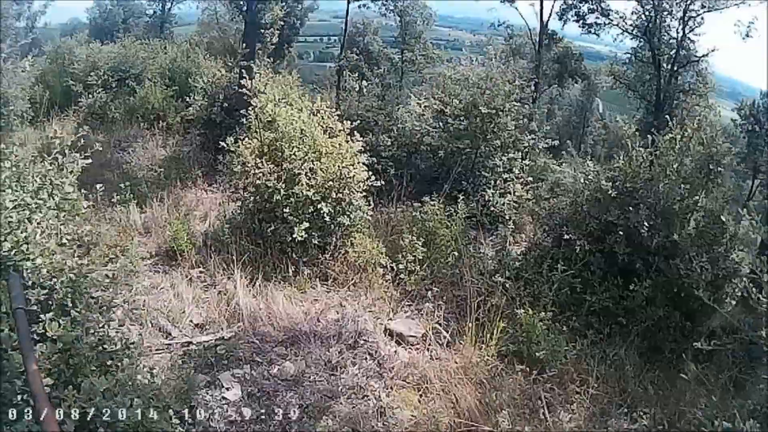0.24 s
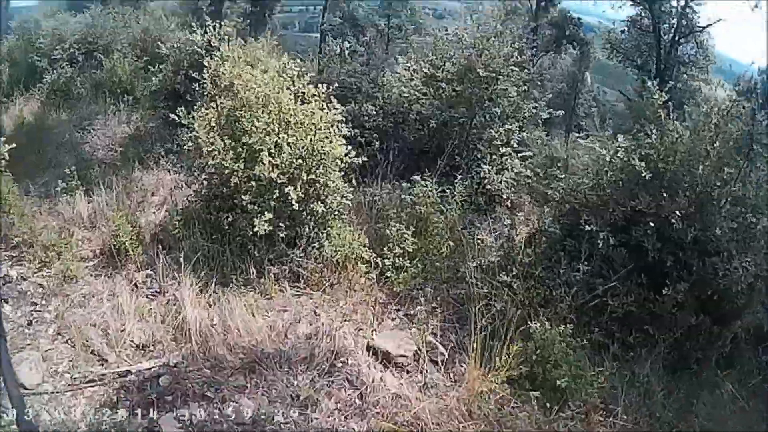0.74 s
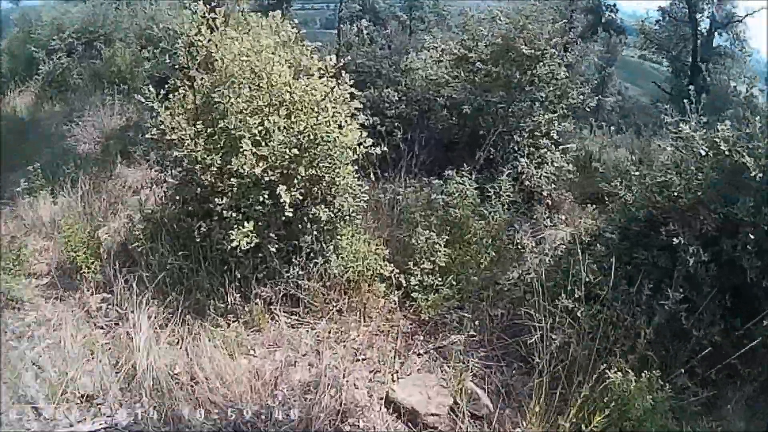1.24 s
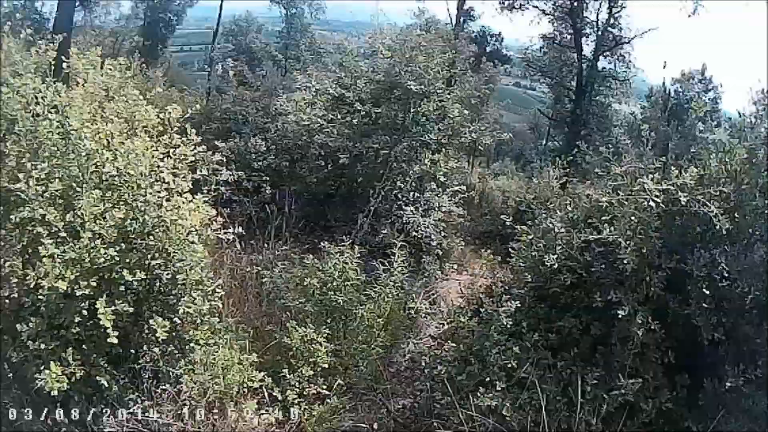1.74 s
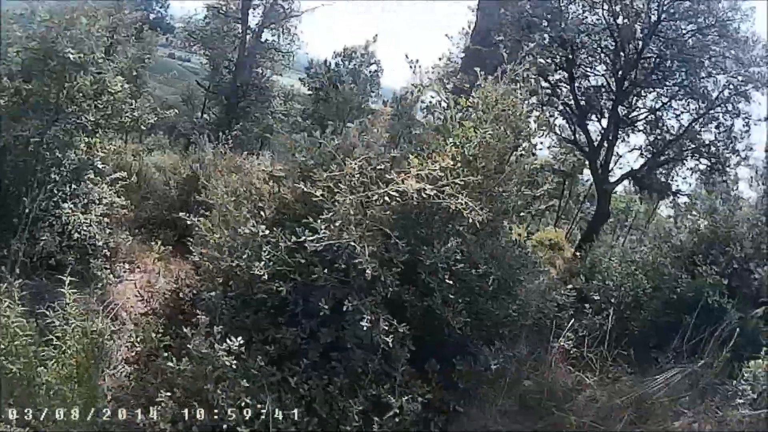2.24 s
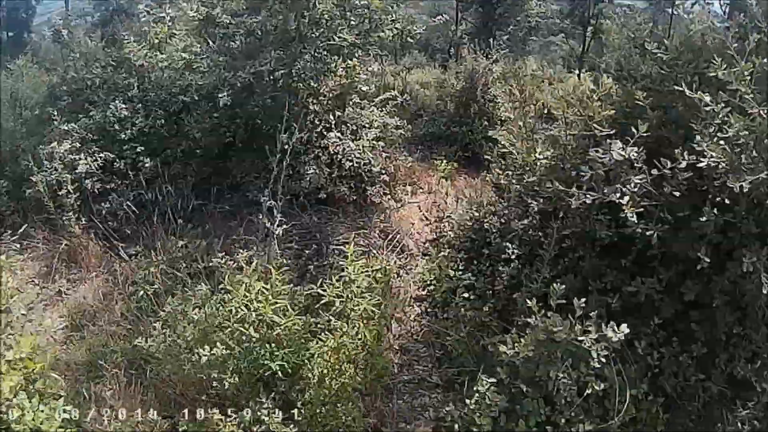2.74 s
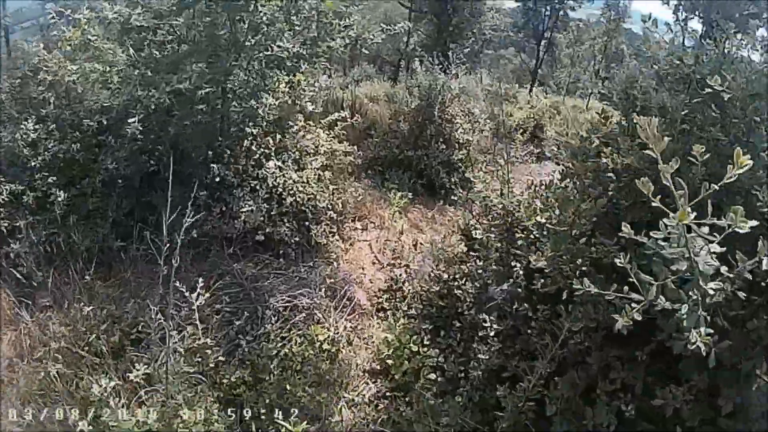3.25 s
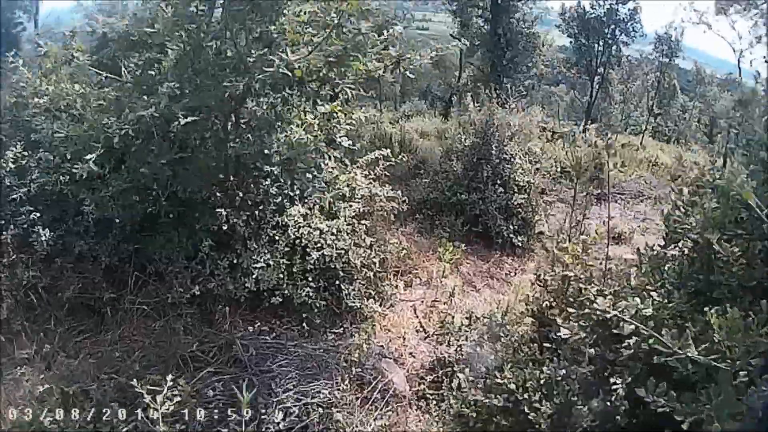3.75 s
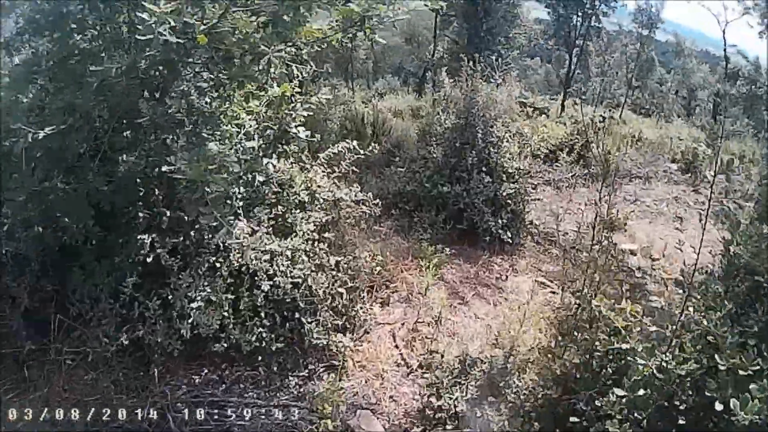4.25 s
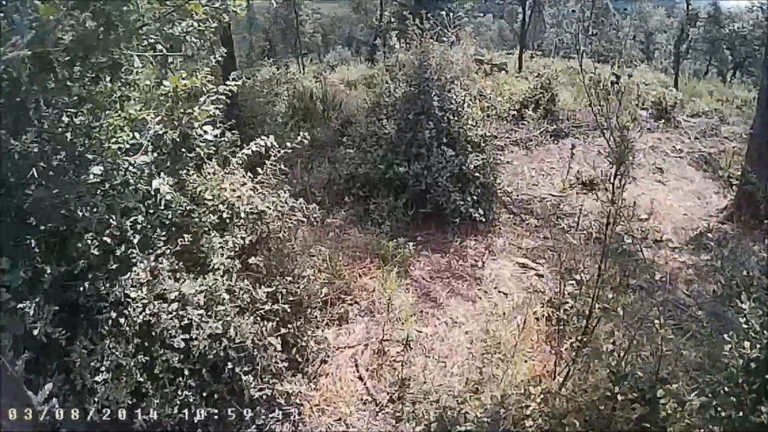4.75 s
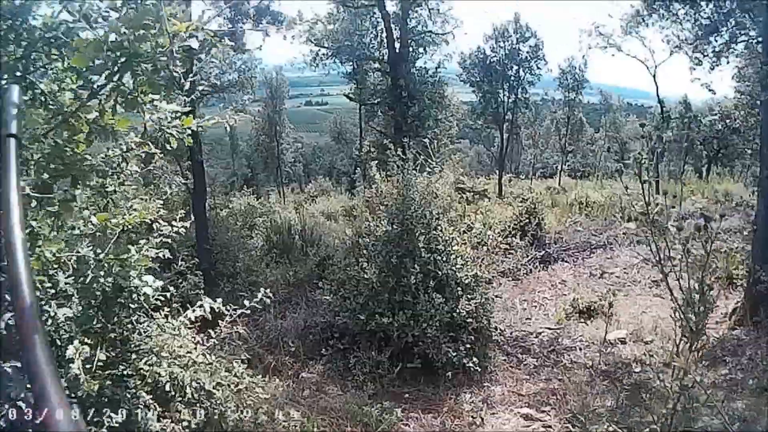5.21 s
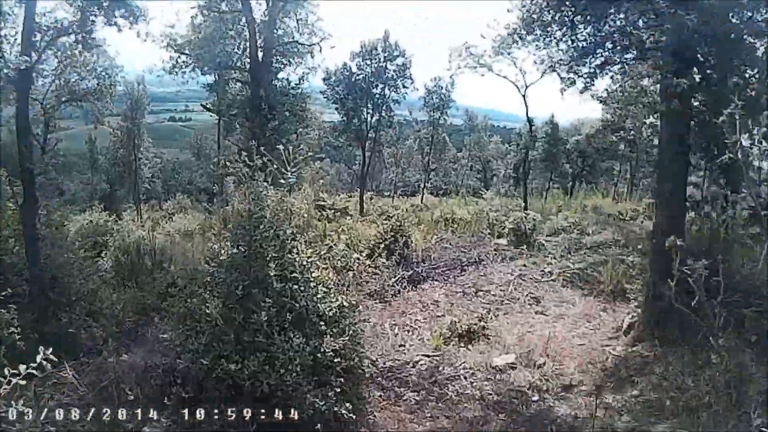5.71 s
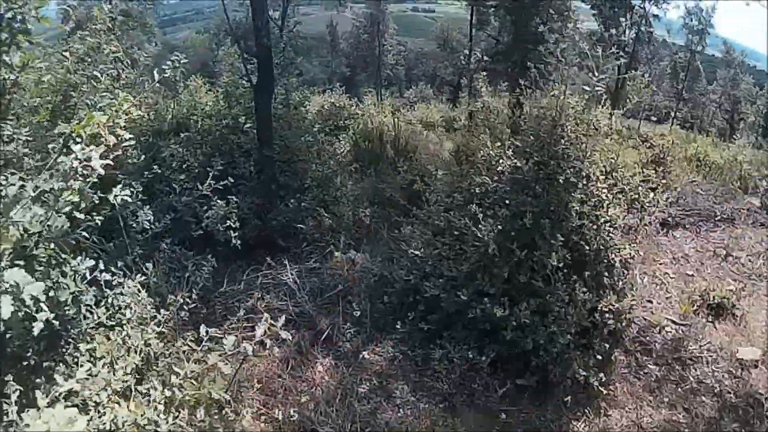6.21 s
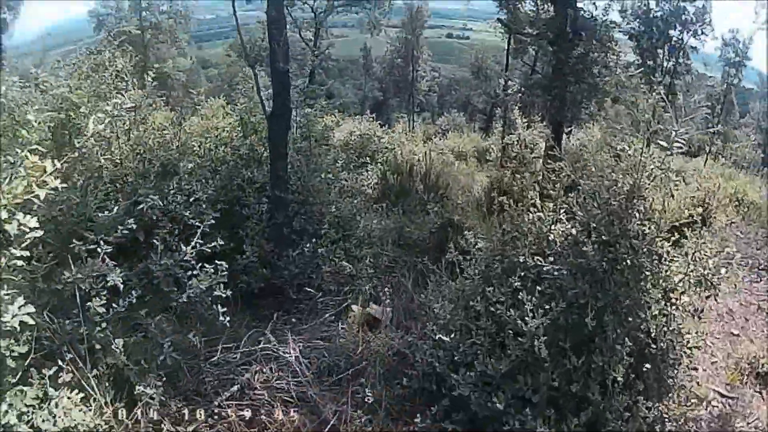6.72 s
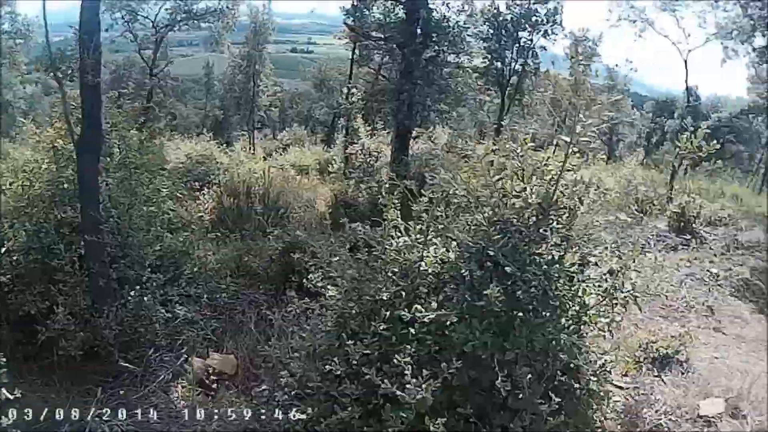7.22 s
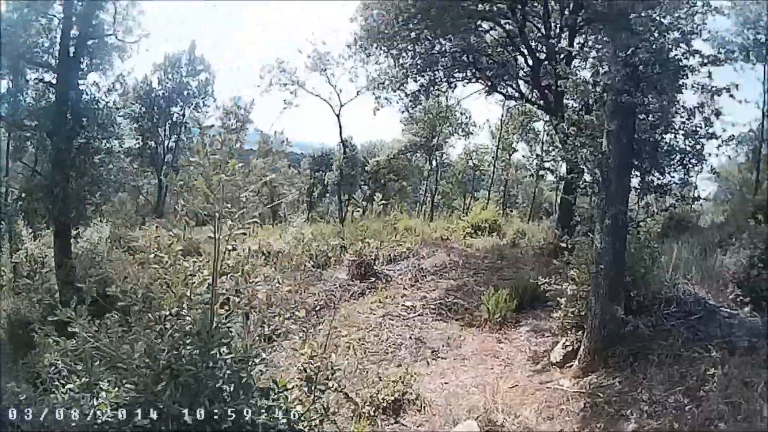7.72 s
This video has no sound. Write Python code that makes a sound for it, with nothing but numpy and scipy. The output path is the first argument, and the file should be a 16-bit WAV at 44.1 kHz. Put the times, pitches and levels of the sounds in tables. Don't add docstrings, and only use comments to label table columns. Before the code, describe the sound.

Close, boxy handling noise from a camera in a hard housing carried through dry scrub outdoors. Deep mount thumps and hollow plastic clacks cluster in the first second, then recur irregularly, with the sharpest knock near 3.8 seconds. Muffled crunching litter and cloth-like rubbing swell with each stride. A few twigs snap early, over faint hiss and a high whine.

```python
import sys
import numpy as np
from scipy import signal
from scipy.fft import rfft, irfft, next_fast_len
from scipy.io import wavfile
from scipy.ndimage import uniform_filter1d, map_coordinates

SR = 44100
rng = np.random.default_rng(int(sys.argv[2]) if len(sys.argv) > 2 else 0)


def dump(signal):
    limited = np.clip(np.atleast_2d(signal).T, -1, 1)
    pcm = np.round(limited * 32767).astype(np.int16)
    wavfile.write(sys.argv[1], SR, pcm)


def rack_gain(trim_db):
    fader = np.asarray(trim_db, float)
    return 10 ** (fader / 20)


N = 351477
STEP_S = 0.002

# (time [s], main mode peak [dB], then relative to it:
# lower modes [dB], upper modes [dB], bright modes [dB])
KNOCKS = [(0.032, -27, -12, -14, -13), (0.507, -35.5, -2, -6, -16), (0.512, -23, -9, -15, -17),
          (0.53, -32.5, 2, 3.5, -1.5), (0.537, -29, -1, -4, -9), (0.561, -49, -6, 0, 2),
          (0.575, -32, -8, -7, -15), (0.867, -48, -13, 5, 2), (0.906, -22.5, -7.5, -11, -15),
          (0.918, -31, -1, -13, -7), (0.972, -35, -6, -11, -17), (0.99, -41.5, 5, 7.5, 0),
          (1.131, -35, -6, -4, -7), (1.27, -26.5, -8, -12, -15), (1.515, -30, -7, -11, -16),
          (1.949, -31, -9, -2, -22), (2.425, -31.5, -22, -7, -8), (2.671, -25.5, -25, -7, -14.5),
          (2.684, -31.5, -6, -16, -9), (3.664, -38, -9, -4, -5), (3.725, -49, 3, 10, 9),
          (3.743, -34, -4, -4, -21), (3.765, -32, 3, -12, -11), (3.776, -13, -9, -10.5, -8.5),
          (3.781, -28, -5, -10, -3.5), (3.789, -38, 6, -7, -5), (3.83, -30.5, -7, -8, -13),
          (3.846, -41, -5, -12, -1), (4.013, -43, -2, -17, 4.5), (4.044, -38, -13, -27, -8),
          (4.152, -21.5, -7, -9, -13), (5.422, -27.5, -4, -7.5, -10), (5.821, -21.5, -12, -8.5, -5.5),
          (7.004, -40.5, -8, -19, -12), (7.138, -40.5, -10, -6, -7.5), (7.228, -33.5, -16, -2.5, 0.5),
          (7.326, -37.5, -2, -10, -14), (7.346, -41, -4, -9, 1.5), (7.403, -44, -11, -16, -3),
          (7.51, -40, -5, -6.5, -9)]
# (frequency [Hz], bandwidth [Hz], level [dB])
SHELL = [(1190.4, 80, 2.5), (1358, 87, -2.5)]


def unit(x):
    return x / np.sqrt(np.mean(x ** 2) + 1e-20)


def wobble(rate):
    knots = rng.standard_normal(int(N * rate / SR) + 4)
    return map_coordinates(knots, [np.arange(N) * rate / SR])


def filtered(x, response):
    m = next_fast_len(N + SR // 2)
    return irfft(rfft(x, m) * response(np.fft.rfftfreq(m, 1 / SR)), m)[:N]


def coloured(x, points):
    f, db = np.transpose(points)
    return unit(filtered(x, lambda hz: rack_gain(np.interp(np.log(hz + 1), np.log(f), db))))


def ring(x, modes):
    def response(f):
        total = 0
        for k, (centre, width, db) in enumerate(modes):
            damping = 1j * f * width
            total = total + (-1) ** k * rack_gain(db) * damping / (centre ** 2 - f ** 2 + damping)
        return total
    return filtered(x, response)


def low_pass(x, hz):
    return filtered(x, lambda f: 1 / (1 + 1.3j * f / hz - (f / hz) ** 2) ** 2)


def gritty(per_second, spread_db, share):
    hit, size, sign = rng.random((3, N))
    heights = rack_gain(-spread_db * np.log(size + 0.026))
    grains = (hit < per_second / SR) * heights * np.sign(sign - 0.5)
    return np.sqrt(share) * unit(grains) + np.sqrt(1 - share) * rng.standard_normal(N)


def contacts(rows, ms, rough, hz, width=0.14):
    force = np.zeros((len(hz), N + SR))
    u = np.arange(SR // 20) / SR / (ms / 1000)
    near = np.abs(np.fft.rfftfreq(len(u), 1 / SR) / np.array(hz)[:, None] - 1) < width
    for s, db, *colours_db in rows:
        push = np.sqrt(u) * np.exp(-u) * rng.standard_normal(len(u))
        push[8] += np.linalg.norm(push) / rough
        strength = np.sqrt(near @ np.abs(rfft(push)) ** 2 / near.sum(1))
        gain = rack_gain(db + np.array([0, *colours_db])) / strength
        force[:, round(s * SR):][:, :len(u)] += push * gain[:, None]
    return force[:, :N]


def summed_db(rows_db, rest_db):
    return 10 * np.log10(sum(rack_gain(2 * db) for db in rows_db) + rack_gain(2 * rest_db))


def bell_db(offset):
    return -10 / np.log(10) * np.minimum(offset ** 2, 50)


def per_sample(slow):
    return np.interp(np.arange(N) / SR, np.arange(len(slow)) * STEP_S, slow)


def strides(rub_share=0):
    # (time [s], strength [dB], rise [s], fall [s], rubbing above the usual [dB])
    stride_rows = [(0.032, -58.5, 0.063, 0.096, -7.5), (0.5, -67, 0.59, 0.52, 1),
                   (0.87, -65, 0.36, 0.54, 1.5), (1.288, -60.5, 0.18, 0.09, -4),
                   (1.753, -63, 0.13, 0.051, -1), (2.141, -61.5, 0.24, 0.11, 0.5),
                   (2.8, -79.5, 0.15, 0.026, 13), (2.939, -62.5, 0.39, 0.087, 0.5),
                   (3.302, -60, 0.11, 0.14, -1), (3.768, -67.5, 0.2, 0.025, 1.5),
                   (4.136, -61, 0.21, 0.093, -3), (4.705, -63, 0.1, 0.098, -2),
                   (5.141, -63, 0.076, 0.23, -0.5), (5.68, -63, 0.13, 0.2, -6.5),
                   (5.804, -61.5, 0.082, 0.08, 2), (6.401, -62.5, 0.083, 0.077, -1.5),
                   (6.955, -63.5, 0.12, 0.17, -3.5), (7.439, -71, 0.21, 0.021, 5.5),
                   (7.537, -62.5, 0.25, 0.084, -0.5), (7.819, -71.5, 0.11, 0.11, 3)]
    still_db, usual_db = -68, -63
    t = np.arange(0, N / SR, STEP_S)
    rows_db = []
    for s, db, rise, fall, rub_db in stride_rows:
        bell = bell_db((t - s) / np.where(t < s, rise, fall))
        rows_db.append(db + rub_share * rub_db + bell)
    return summed_db(rows_db, still_db) - usual_db


def jolts():
    # (time [s], peak [dB], hold [s], decay [dB/s], shudder relative to it [dB])
    jolt_rows = [(0.003, -22, 0.064, 333, -27), (0.27, -32.5, 0.045, 99, -11.5),
                 (0.528, -9.5, 0.001, 261, -16.5), (0.597, -22, 0.024, 539, -6),
                 (0.704, -30.5, 0.12, 602.5, -10), (0.923, -8.5, 0.0011, 523, -25),
                 (0.964, -18.5, 0.011, 153, -11.5), (1.146, -17, 0.048, 121, -12.5),
                 (1.621, -16.5, 0.02, 213, -14.5), (1.805, -38.5, 0.24, 598, -11),
                 (2.055, -21, 0.053, 183, -15.5), (2.662, -26.5, 0.074, 64.5, -5.5),
                 (3.202, -21.5, 0.0016, 88.5, -20.5), (3.758, -13.5, 0.073, 163, -8),
                 (4.01, -21, 0.084, 196, -12.5), (4.581, -27, 0.11, 344, -32),
                 (5.105, -23.5, 0.068, 290, -17), (5.299, -38, 0.004, 49, -18),
                 (5.623, -21, 0.068, 115, -19), (6.275, -27, 0.025, 129, -16), (6.861, -38, 0.13, 26, -11),
                 (7.334, -22, 0.055, 174, -9.5), (7.524, -26, 0.0032, 430, -16.5),
                 (7.731, -39, 0.071, 601, -12)]
    # (time [s], peak [dB])
    stirs = [(.2, -39.5), (2.47, -42), (2.93, -37.5), (3.52, -38), (4.341, -43.5), (4.42, -43),
             (4.616, -27.5), (5.03, -34.5), (5.54, -41), (5.98, -40), (6.1, -45.5), (6.381, -35.5),
             (6.77, -45), (6.81, -40), (2.32, -42.5), (2.56, -40.5), (7.37, -19), (7.87, -46), (7.95, -40)]
    rise_db_s, shudder_faster_db_s = 639, 47
    t = np.arange(0, N / SR, STEP_S)
    swing, shudder = [], []
    for s, db, hold, dying, shudder_db in jolt_rows + [(s, db, 0.023, 305, -16.5) for s, db in stirs]:
        rise_db = db + rise_db_s * np.minimum(t - s, 0)
        swing.append(rise_db - dying * np.maximum(t - s - hold, 0))
        shudder.append(swing[-1] + shudder_db - shudder_faster_db_s * np.maximum(t - s, 0))
    rest_db = -49 + strides()
    return summed_db(swing, rest_db), summed_db(shudder, rest_db - 7)


def mount():
    # (frequency [Hz], level [dB per Hz])
    sway_spectrum = [(15, -27), (26, 2.5), (37, -2), (50, -0.5), (65, -28), (120, -55.5)]
    shudder_spectrum = [(35, -33), (52, 6.5), (75, 2), (100, -3.5), (130, -15), (200, -79)]
    db, shudder_db = map(per_sample, jolts())
    loading = uniform_filter1d(np.clip(np.gradient(db) * SR / 300, 0, 1.5), size=1500)
    pitch_hz = 36.5 + 7 * loading + 1.53 * wobble(5)
    phase = 2 * np.pi * np.cumsum(pitch_hz) / SR
    swing = np.sqrt(2) * rack_gain(1.5 * wobble(25)) * np.cos(phase - 1)
    loose = np.clip((-28 - db) / 14, 0, 0.7)
    sway = coloured(rng.standard_normal(N), sway_spectrum)
    shudder = rack_gain(shudder_db + 3) * coloured(rng.standard_normal(N), shudder_spectrum)
    level = rack_gain(db + 5 * loose * wobble(8.7))
    return level * (np.sqrt(1 - loose) * swing + np.sqrt(loose) * sway) + shudder


def nudges():
    # (time [s], peak [dB], pitch [Hz])
    nudge_rows = [(0.696, -34, 57.6), (0.722, -24, 72.5), (1.948, -29, 86), (2.428, -36, 81.2),
                  (2.832, -31.5, 57.5), (5.414, -30.5, 56.8), (7.71, -29.5, 67.3), (.001, -27, 88),
                  (1.508, -39, 86.5), (3.75, -17, 58), (3.78, -15.5, 75.4), (4.149, -33, 84),
                  (7.36, -23, 67.4), (2.664, -35, 75.5)]
    out = np.zeros(N + SR)
    t = np.arange(SR // 5) / SR
    onset = 1 - np.exp(-t / 0.0029)
    for s, db, hz in nudge_rows:
        decay = rack_gain(db + 7 - 60 * t / 0.1)
        out[round(s * SR):][:len(t)] += decay * onset * np.sin(2 * np.pi * hz * t)
    return out[:N]


def chatter(count=2):
    level_db, spread_db, fades_db_s = -31.5, 7.5, 153
    late = rng.exponential(0.025, (len(KNOCKS), count)) + 0.004
    size = rng.standard_normal((len(KNOCKS), count))
    rows = []
    for (s, db, *colours_db), lags, sizes in zip(KNOCKS, late, size):
        for lag, g in zip(lags, sizes):
            rows.append((s + lag, db + level_db + spread_db * g - fades_db_s * lag, *colours_db))
    return rows


def shell_knocks():
    # (time [s], peak [dB])
    ticks = [(.106, -47), (0.521, -48), (0.542, -49), (.595, -46), (0.602, -50), (0.62, -44), (.873, -54),
             (.904, -30), (0.929, -43), (.955, -49), (0.995, -39), (1.168, -38), (1.495, -44), (1.62, -44),
             (1.954, -37.5), (1.987, -45), (2.636, -47), (2.65, -50), (2.701, -39), (2.715, -47),
             (2.739, -48), (2.755, -47), (2.775, -46), (2.795, -45), (2.81, -53), (2.842, -48),
             (2.859, -44), (2.881, -56), (2.92, -53), (3.186, -47), (3.645, -48), (3.722, -48), (3.77, -40),
             (3.796, -47), (3.81, -48), (3.835, -47), (3.947, -52), (3.997, -46), (4.007, -50),
             (4.036, -41), (4.093, -47), (4.102, -49), (4.16, -39), (5.16, -50), (7.209, -51),
             (7.219, -41.5), (7.363, -50), (7.37, -50), (7.38, -48), (7.396, -45), (7.542, -53)]
    # (lower, upper, bright modes relative to the main [dB])
    tick_colour_db = (-7, -5, -10.5)
    # (frequency [Hz], bandwidth [Hz], level [dB])
    lower_modes = [(660, 430, -8), (846, 130, -1), (986, 29, -4)]
    upper_modes = [(1543, 78, -1), (1802, 64, -11.5)]
    bright_modes = [(1960, 58, -13), (2162, 110, -0.5), (2804, 153, -4), (3170, 210, -7.5),
                    (3550, 130, -8.5), (3850, 140, -9), (4380, 170, -13), (5040, 550, -29)]
    rows = KNOCKS + [(s, db, *tick_colour_db) for s, db in ticks] + chatter()
    force, lower, upper, bright = contacts(rows, ms=1.39, rough=1.02, hz=[1260, 860, 1580, 2280])
    main = ring(rack_gain(39) * ring(force, SHELL), [(1320, 890, 0)])
    body = main + rack_gain(40) * ring(lower, lower_modes) + rack_gain(42.5) * ring(upper, upper_modes)
    return low_pass(body, hz=2730) + low_pass(rack_gain(31.5) * ring(bright, bright_modes), hz=5050)


def case_bumps():
    # (time [s], middle mode peak [dB], then relative to it: low [dB], upper [dB])
    bumps = [(0.004, -31.5, -0.5, 1), (0.106, -39, -10, 4), (0.451, -47.5, -12, 9), (0.511, -30, -3, 4.5),
             (0.525, -23.5, 0, -0.5), (0.592, -41, -3, -19), (0.721, -36.5, 0, 0), (0.734, -42, -12, -20),
             (0.783, -34.5, -10, -0.5), (0.906, -19.5, -6, -4), (0.917, -30, -3, 3), (0.972, -28, -3, -3.5),
             (1.164, -25.5, -15, -7.5), (1.271, -32, -15, 1), (1.51, -34, 0.5, -1), (1.61, -36.5, 3, -1),
             (1.789, -37.5, -6, 3.5), (1.947, -37, -2, 10), (2.085, -46, 4, -4), (2.421, -48, 3.5, 16.5),
             (2.636, -37, -7, -2), (2.667, -28.5, -1.5, 2), (2.681, -24, -4.5, -1), (2.851, -38, -10, -17),
             (3.187, -41, -8, 3), (3.245, -49, 10, -14), (3.62, -41, -5, 2.5), (3.66, -40, -4, -10),
             (3.684, -42, 2, -14), (3.74, -32, 1, 2), (3.773, -17.5, 1, 0), (3.783, -31.5, -6, 10.5),
             (3.825, -26, -3, -0.5), (3.944, -43, -7, 6), (3.993, -30.5, -1, -12), (4.01, -26.5, -7, -2.5),
             (4.035, -38, 8.5, 2), (4.148, -30, 2, 8), (5.106, -42, 2, -19), (5.159, -35.5, -5, 1.5),
             (5.208, -53, 1, 14), (5.419, -37, -1, 6), (5.816, -36, -0.5, 2.5), (7.13, -39.5, -12, 3),
             (7.224, -30.5, -3, 4), (7.324, -28, -0.5, -5), (7.342, -27, -10, -16), (7.367, -32, 3, 2),
             (7.401, -30, -17, -10), (7.504, -33, -12, -4)]
    # (frequency [Hz], bandwidth [Hz], level [dB])
    low_modes = [(142, 43, 0.0062)]
    middle_modes = [(182, 47, -6.5), (232.6, 32.4, 1.5), (307, 46, -10)]
    upper_modes = [(385.5, 52, 5), (519, 170, -10.5)]
    force = contacts(bumps, ms=4.5, rough=1.09, hz=[215, 135, 430], width=0.22)
    middle, low, upper = np.roll(force, SR // 500, axis=1)
    thud = rack_gain(49.5) * (ring(middle, middle_modes) + ring(low, low_modes))
    return low_pass(thud, hz=394) + low_pass(rack_gain(41) * ring(upper, upper_modes), hz=676)


def twigs():
    # (time [s], peak [dB])
    snaps = [
        (0.0318, -31.5),
        (0.0474, -46),
        (0.5077, -42),
        (1.1308, -35),
    ]
    # (time [s], level [dB])
    sweep = [
        (0, -47),
        (.04, -82),
        (.07, -65),
        (.11, -57),
        (.14, -70),
        (.2, -92),
    ]
    # (frequency [Hz], level [dB per Hz])
    leaf_spectrum = [(1200, -27.5), (2200, -1), (3700, 10), (6500, -16), (11000, -17), (14000, -26)]
    force = contacts(snaps, ms=2.2, rough=4.5, hz=[6060])[0]
    cracks = rack_gain(16) * ring(force, [(3870, 1200, -0.5), (6450, 1100, 2.5), (10800, 1200, -4)])
    sweep_db = np.interp(np.arange(N) / SR, *np.transpose(sweep))
    leaves = coloured(gritty(410, 2.7, 0.4), leaf_spectrum)
    return cracks + rack_gain(sweep_db + 2 * wobble(82)) * leaves


def drags():
    # (time [s], level [dB], half length [s])
    drag_rows = [(0.085, -48.5, 0.06), (.33, -57, 0.082), (0.645, -51, 0.046), (0.79, -51.5, 0.062),
                 (0.956, -53, 0.036), (1.07, -57, 0.056), (1.215, -61, 0.068), (1.328, -56, 0.047),
                 (1.66, -54, 0.043), (2.005, -57, .05), (2.46, -60, 0.021), (2.57, -61, 0.015),
                 (2.624, -56, .03), (2.76, -50, 0.067), (2.92, -57.5, .06), (3.3, -59, .1),
                 (3.953, -56, 0.036), (4.1, -53, .05), (4.42, -59.5, 0.089), (4.702, -71, 0.089),
                 (5.163, -56, 0.079), (5.763, -58, .05), (6.902, -61, 0.13), (7.279, -64, .04),
                 (7.376, -53, 0.036), (7.448, -53, .04), (7.533, -56, 0.026), (7.83, -64, 0.052)]
    t = np.arange(0, N / SR, STEP_S)
    return [db + bell_db((t - s) / half) for s, db, half in drag_rows]


def cloth_rub(clumps):
    # (frequency [Hz], level [dB per Hz])
    rub_spectrum = [(60, -30), (110, 2.5), (220, 0.5), (320, -3), (410, -5), (600, -12), (900, -20.5),
                    (1500, -51)]
    rub_db = summed_db([jolts()[0] - 35], -57 + 1.5 * strides(rub_share=1))
    level = rack_gain(per_sample(rub_db) + 4 + 0.95 * wobble(18) + 1.6 * clumps)
    return level * coloured(gritty(60, 1.1, 0.14), rub_spectrum)


def litter(clumps):
    # (frequency [Hz], level [dB per Hz])
    litter_spectrum = [(300, -53), (600, -3), (1050, -5.5), (1220, -0.5), (1400, -6), (1600, -6.5),
                       (1900, -11.5), (2400, -14), (3500, -16), (6000, -25.5), (9000, -55)]
    litter_db = -61.5 + 1.6 * strides(rub_share=0.2)
    rattle_db = -64 + 0.67 * (jolts()[0] + 23.5)
    striking_db = [rattle_db - litter_db] + [db - litter_db - 6 for db in drags()]
    taps_db = per_sample(summed_db(striking_db, -8))
    crunch = coloured(gritty(600, 3.4, 0.11), litter_spectrum)
    taps = unit(ring(gritty(300, 6.4, 0.43), SHELL + [(1590, 165, -5.5), (2150, 200, -18)]))
    level = rack_gain(per_sample(litter_db) + 1 + 1.43 * clumps + 1.1 * wobble(50))
    return level * (crunch + rack_gain(taps_db) * taps)


def amplifier_noise(clumps):
    # (frequency [Hz], level [dB per Hz])
    hiss_spectrum = [(1000, 1), (2500, -1.5), (6000, -4), (8400, -5), (14000, -7), (14900, -7),
                     (15500, -27), (15800, -65)]
    # (frequency [Hz], level [dB rms])
    whine_tones = [(7721, -82), (7781, -83.5), (7842, -94), (7902, -78), (7933, -82), (7963, -79.5),
                   (8024, -100)]
    t = np.arange(N) / SR
    whine = np.zeros(N)
    for hz, db in whine_tones:
        level = rack_gain(db + 60 + 4.9 * wobble(3.6))
        whine += level * np.sin(2 * np.pi * hz * t + 0.6 * wobble(3.6))
    hiss = rack_gain(0.45 * clumps) * coloured(rng.standard_normal(N), hiss_spectrum)
    return rack_gain(per_sample(-60 + 0.96 * strides())) * (hiss + whine)


def scene():
    clumps = wobble(22)
    handling = mount() + nudges() + shell_knocks() + case_bumps()
    brush = twigs() + cloth_rub(clumps) + litter(clumps)
    return (handling + brush + amplifier_noise(clumps))[None]


def band_limit(x):
    return signal.sosfilt(signal.butter(12, 15700, fs=SR, output="sos"), x)


def record(dry):
    low_hz, top_hz = 12, 15650
    wet = filtered(dry[0], lambda f: 1j * f / (low_hz + 1j * f) * (f < top_hz))[None]
    return band_limit(wet)


dry = scene()
out = record(dry)
dump(out)
```